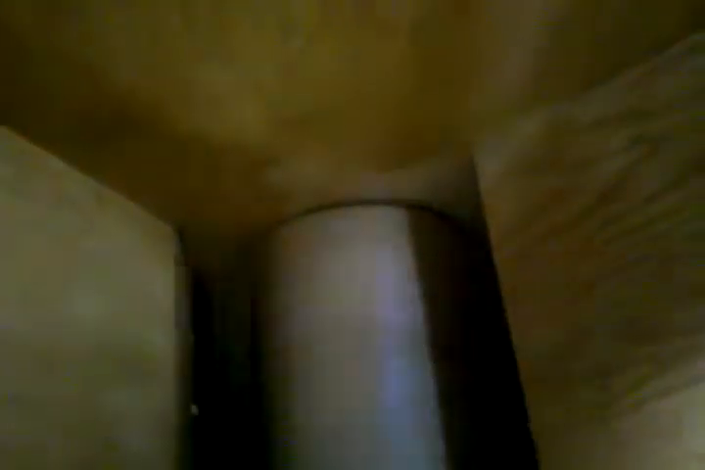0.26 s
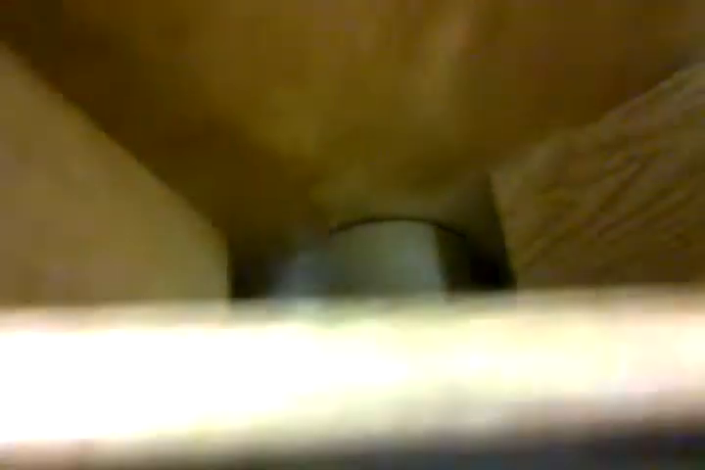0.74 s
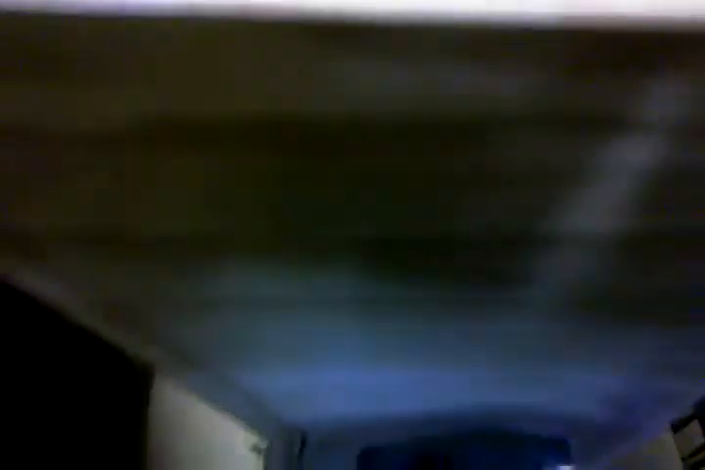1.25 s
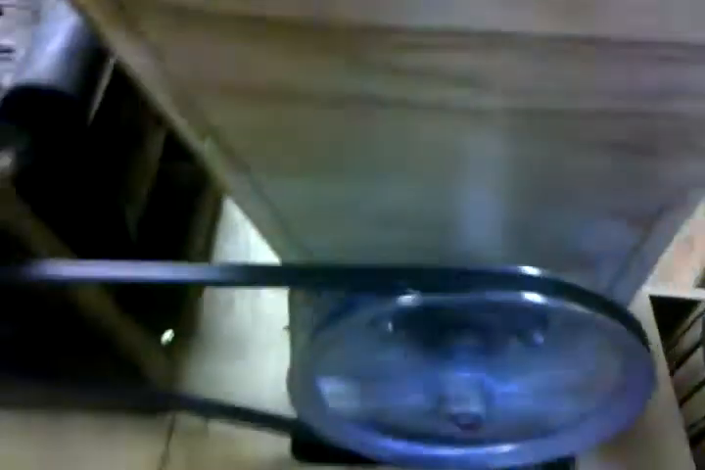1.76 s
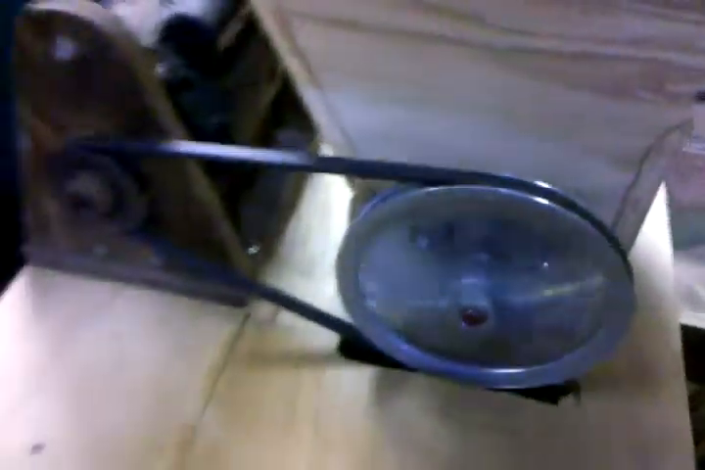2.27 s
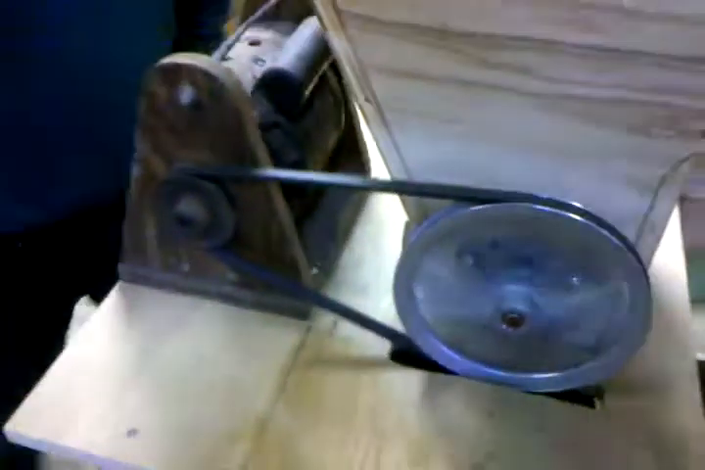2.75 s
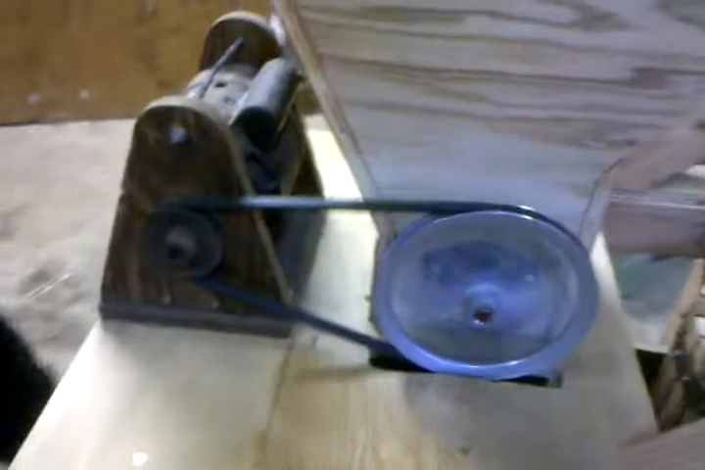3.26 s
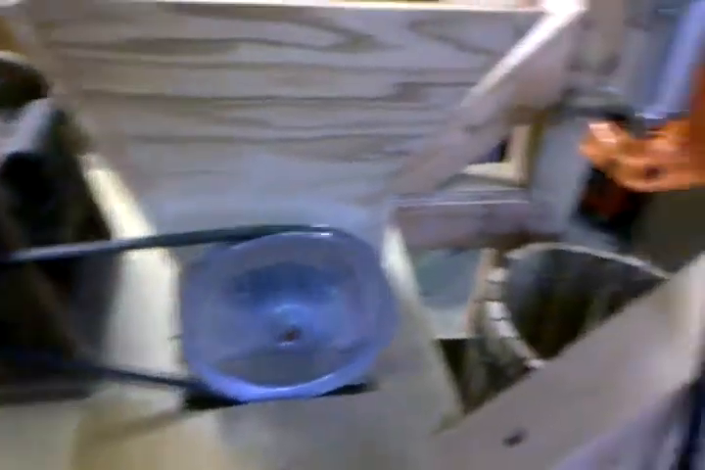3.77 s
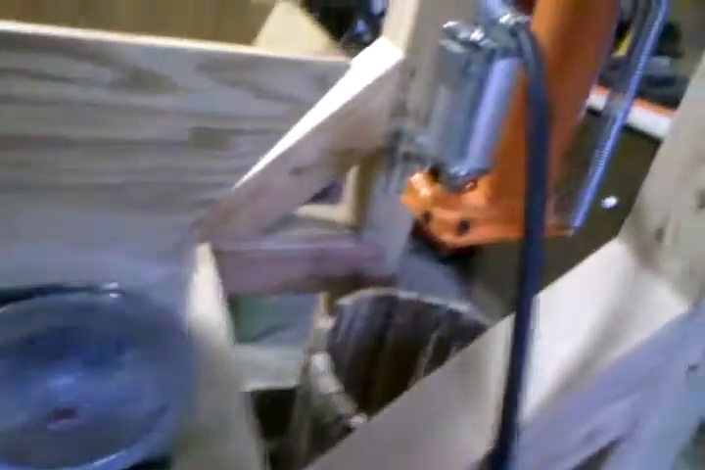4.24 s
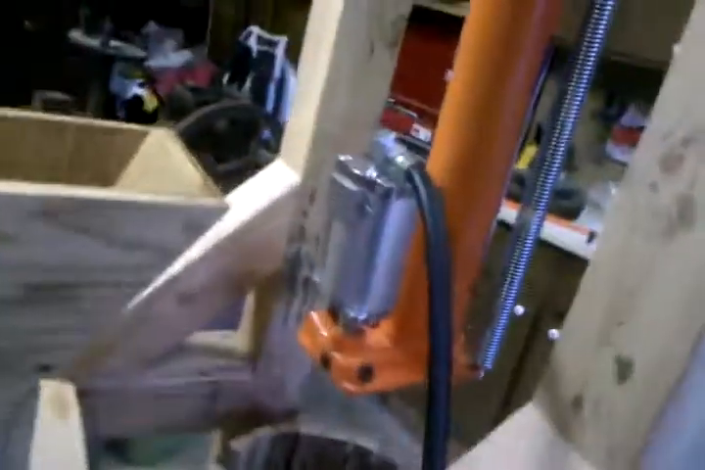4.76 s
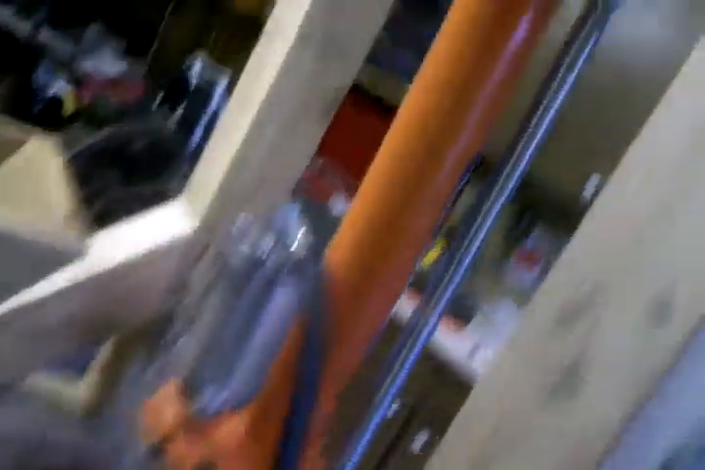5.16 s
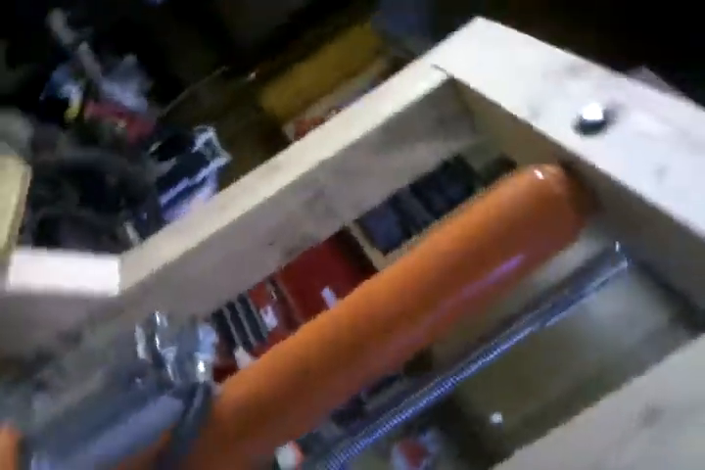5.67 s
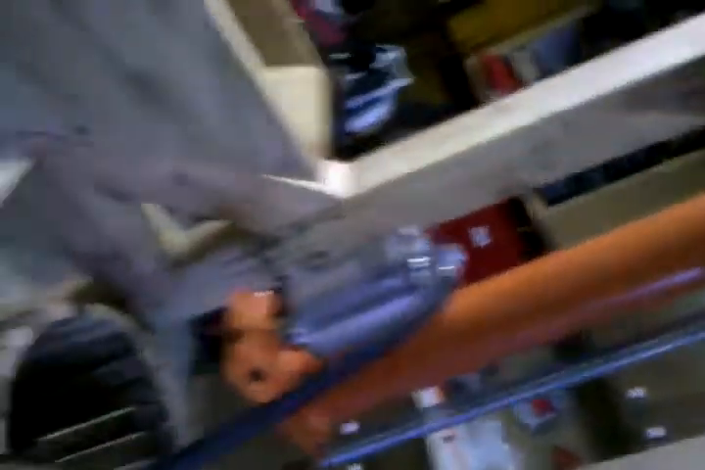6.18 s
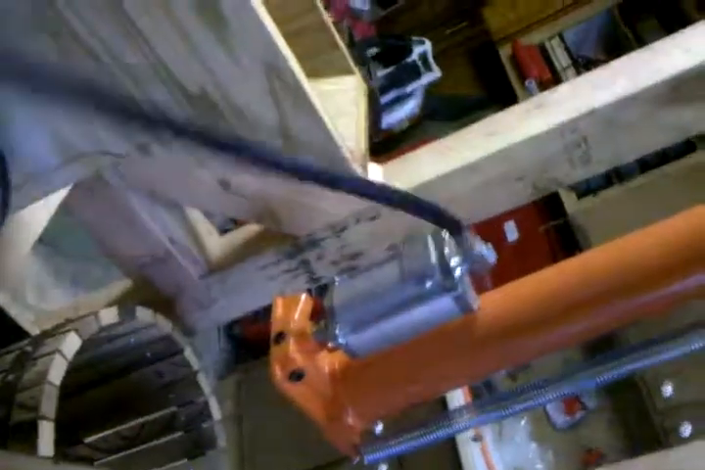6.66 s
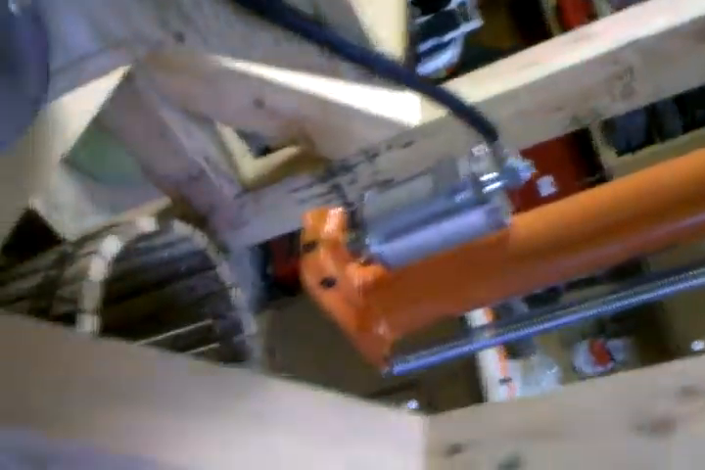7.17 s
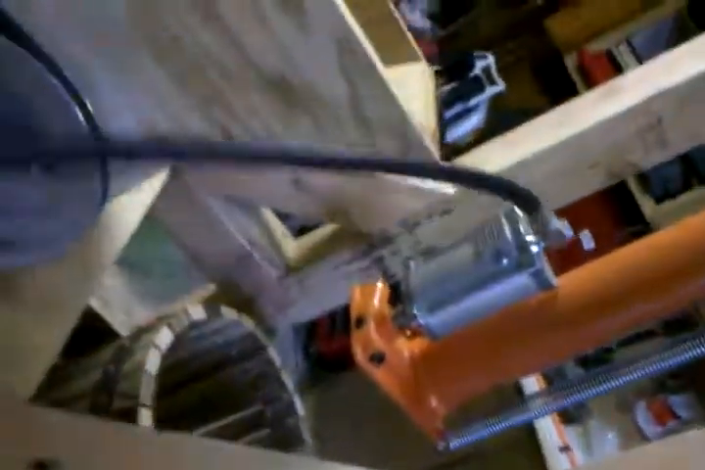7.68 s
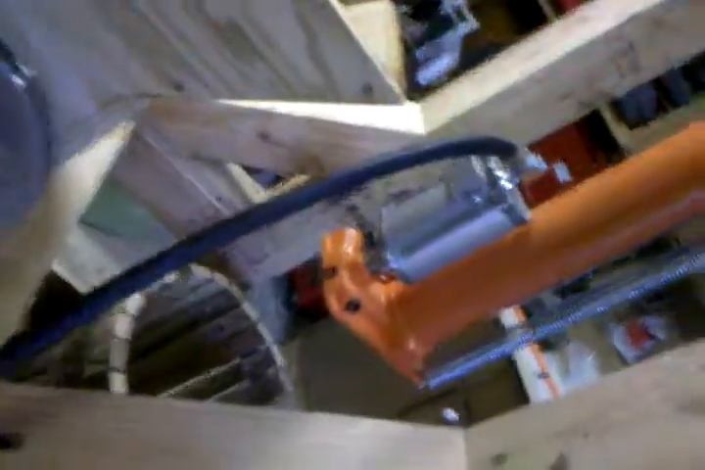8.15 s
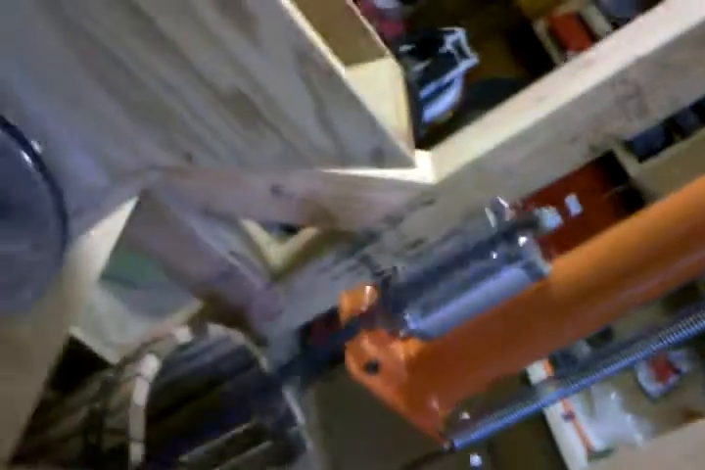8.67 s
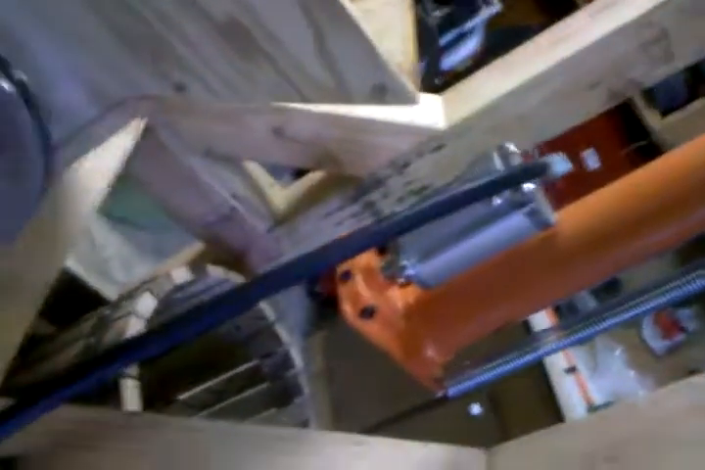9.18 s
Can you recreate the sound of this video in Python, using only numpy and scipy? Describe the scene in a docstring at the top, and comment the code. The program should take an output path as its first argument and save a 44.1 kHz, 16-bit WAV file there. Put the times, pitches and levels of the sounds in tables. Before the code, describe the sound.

A belt-driven grinder hums, knocks and rattles steadily in a workshop; near the end an air jack pumps twice with clacks and hiss.

```python
"""Apple grinder and air jack.

A home-made grinder runs empty in a workshop: a motor belts a toothed drum in a plywood hopper.
Each shaft turn shakes the frame, which hums, knocks and rattles as the microphone is carried round it.
Near the end an air-driven jack pumps twice: clacks, thuds, exhaust hiss. One tick, one dropout."""
import sys
import numpy as np
from scipy import signal
from scipy.fft import rfft, irfft, next_fast_len
from scipy.io import wavfile

SR = 44100
rng = np.random.default_rng(int(sys.argv[2]) if len(sys.argv) > 2 else 0)


def wav_out(sig):
    """Save sig, one row per channel (or a flat mono array), as 16-bit PCM at SR to the path in sys.argv[1]."""
    wavfile.write(sys.argv[1], SR, np.round(np.clip(np.atleast_2d(sig).T, -1, 1) * 32767).astype(np.int16))


N = 415422
TIME_S = np.arange(N) / SR

SHAFT_HZ, FLAP_HZ = 29.195, 19.98
LAP_S, LAP_PEAK_S, LAP_ORDER, LAP_DEPTH_DB = .378, 2.53, 11, 3
TICK_S, LINK_S, LINK_DB = 4.3344, 5.622, -26
DROPOUT_START_S, DROPOUT_END_S = 7.2335, 7.3613

# microphone stops, part: arrive_s, leave_s, fade_s
VISITS = {"hopper": (-1, 1.93, 0.088), "pulley": (1.72, 3.9, 0.22), "jack": (4.06, 5.79, 0.17),
          "press": (5.77, 10, 0.22)}
# frame hum: shaft_order, level_db
FRAME_HUM = [(2, -29), (3, -32.5), (4, -25.5), (5, -22), (6, -21.5), (7, -18.5), (8, -10.5), (9, -19),
             (10, -11.5), (12, -10), (13, -14.5), (15, -17.5), (17, -11.5), (20, -16), (21, -13.5),
             (22, -14), (23, -14.5), (24, -16), (25, -16)]
# harmonics each part radiates best, shaft_order: level_db
HOPPER_HUM = {9: -38, 10: -42.5, 11: -37.5, 13: -42.5, 17: -33, 23: -43.5, 30: -46.5, 33: -44.5, 42: -46,
              44: -47, 70: -47, 93: -49}
PULLEY_HUM = {6: -40, 11: -29.5, 12: -34.5, 13: -34, 23: -44, 29: -48.5, 47: -47.5, 65: -50.5, 93: -51, 94:
              -53.5}
JACK_HUM = {6: -41, 11: -32.5, 12: -37.5, 13: -33.5, 15: -45.5, 21: -38, 24: -39.5, 46: -48, 68: -49.5, 70:
            -44.5, 81: -48.5}
PRESS_HUM = {6: -42.5, 11: -30.5, 12: -36.5, 13: -36, 15: -42, 21: -37.5, 23: -45.5, 24: -40, 25: -39, 33:
             -51, 34: -41, 35: -45.5, 44: -43, 68: -44.5, 70: -45}
# harmonics swelling through the room's standing waves, shaft_order: time_s, level_db
DRONES = { 14: [(0, -47.5), (2.3, -46.5), (3.1, -39), (4.3, -41), (4.7, -33), (5.3, -32.5), (5.9, -32),
          (6.4, -43), (7, -45)], 16: [(0.1, -44), (0.8, -35.5), (1.7, -29), (2.2, -30), (3.1, -24.5),
          (3.8, -25), (4.7, -35), (5.5, -33.5), (6.0, -29), (7.0, -26), (7.7, -25), (9.2, -29)],
          18: [(0, -34.5), (1.5, -37), (1.85, -35), (2.35, -34), (2.7, -55), (3.4, -49), (4.4, -34.5),
          (6, -46.5)], 19: [(0, -36.5), (1.2, -29.5), (1.6, -32), (2.1, -48), (2.6, -40), (3.3, -36),
          (5.15, -32.5), (5.8, -38), (6.3, -35)], 31: [(0, -37.5), (1.6, -46), (1.85, -47), (2.1, -39.5),
          (3.4, -45.5), (5.2, -39), (6.1, -50.5), (7.6, -39.5)], 32: [(0, -38.5), (1.7, -39.5), (1.98, -51),
          (2.3, -42), (3.2, -40), (5.2, -44), (6.0, -54), (7.6, -47.5)], 45: [(0.9, -49), (1.2, -42),
          (1.42, -35), (1.7, -46.5), (3.5, -45), (4.5, -54)], 69: [(1.8, -48), (2.0, -50), (3.9, -49),
          (4.9, -50.5), (5.8, -47), (7.5, -47)]}
# motor and belt tones: pitch_hz, level_db
MAINS_TONES = [(120, -57.5), (360, -40)]
BELT_TONES = [(131.5, -51.5), (146, -52.5), (161, -57.5), (248, -55.5), (277.3, -50.5), (306.5, -44.5),
              (389, -43.5), (423.3, -47.5), (452.5, -51.5)]
# slack side of the belt: flap_order, level_db
FLAP_HARMONICS = [(15, -48.5), (17, -46.5), (20, -38.5), (21, -49), (22, -50), (23, -50), (24, -42),
                  (25, -38.5), (27, -53.5), (31, -52.5), (33, -51.5)]
# hopper air resonance: time_s, pitch_hz, level_db
CAVITY_PATH = [(0, 520, -40), (1.2, 522.4, -36.5), (2.0, 499.5, -36.5), (2.701, 489, -49), (4, 477, -48)]
# three knocks a turn: phase_turns, level_db
BEATS = [(.875, 0), (.485, -3), (.28, -6)]
# levels along the walk: time_s, level_db
KNOCK_LEVELS = [(0, -37), (1.3, -32), (2.0, -39), (2.9, -37.5), (4.2, -48.5), (6.4, -42.5), (7.6, -33.5),
                (9.4, -31)]
RUMBLE_LEVELS = [(0, -40.5), (1.4, -41), (2.7, -42), (4.3, -43), (6.3, -40), (7.1, -46), (7.6, -49.5),
                 (9.4, -48.5)]
RIM_LEVELS = [(1.9, -45), (2.17, -25), (2.28, -37), (2.38, -27.5), (2.55, -29), (2.65, -32), (2.9, -33),
              (3.1, -41)]
# shaft slams, pings of the jack's fittings: start_s, level_db
SLAMS = [(0.033, -32), (1.344, -27), (2.116, -28), (2.527, -30), (2.938, -25), (3.041, -26), (3.075, -23),
         (3.228, -28), (3.998, -30), (5.302, -24), (5.949, -29), (6.159, -30), (7.557, -30), (7.662, -28)]
FITTING_PINGS = [(6.116, -33), (6.215, -35), (6.795, -34), (6.842, -37), (7.173, -31)]
# metal rattle swells: centre_s, width_s, gain_db
RATTLE_SWELLS = [(1.42, 0.26, 1.5), (2.3, .2, 0.8), (2.94, .08, 1.5)]
# metal rubs: start_s, length_s, from_hz, to_hz, level_db
SQUEAKS = [(2.960, 0.035, 1937, 2060, -28), (4.842, 0.011, 1130, 1620, -23)]
# timber frame booms: start_s, level_db, pitch_hz, hold_s, t60_s
THUDS = [(8.943, -22, 198, .01, 0.21), (9.008, -15, 198, .022, .05), (9.268, -27, 180, 0.045, .3)]
# jack strokes: open_s, open_db, strike_s, strike_db, shut_s, shut_db
STROKES = [(9.0058, -17, 9.0250, -13.5, 9.212, -27), (9.264, -26, 9.278, -15, 9.4015, -25.5)]
# body responses: freq_hz, gain_db
MOTOR_SPECTRUM = [(45, -34.5), (88, -19), (120, 3.5), (155, 1.5), (200, -7), (260, -13.5)]
PLYWOOD_SPECTRUM = [(90, -44.5), (150, -21.5), (195, -16), (270, -8), (298, -4), (320, 1.5), (342, -3.5),
                    (380, -6), (440, -10.5), (510, -10), (590, -15), (700, -9), (820, -17), (1100, -27)]
METAL_SPECTRUM = [(600, -22.5), (800, -0.5), (920, -4.5), (1100, -1.5), (1230, 2), (1480, -3.5), (1700, -6),
                  (1880, 0.5), (2030, -1), (2230, -9), (2400, -5.5), (2800, -7.5), (3400, -15.5),
                  (5000, -21.5)]
DRUM_SPECTRUM = [(2000, -6), (2900, -1.5), (3500, -3.5), (4100, -1), (4700, -8.5), (5500, -13),
                 (7500, -33.5)]
BEARING_SPECTRUM = [(3500, -18), (4800, -6.5), (5500, -1), (6100, 2.5), (6450, -1.5), (6850, 0),
                    (7300, -17.5), (7900, -24.5)]
CLACK_SPECTRUM = [(100, -13), (200, 0), (400, 11), (800, 0), (1300, -1), (2000, 5), (3000, -1.5),
                  (3800, 1.5), (5000, -3.5), (6200, 1.5), (6900, -0.5), (7500, -23)]
EXHAUST_SPECTRUM = [(400, -5), (1200, -7), (1900, 2.5), (3200, -15), (3850, -4), (4250, -15), (5200, -14),
                    (5620, 2), (5950, 2.5), (6200, 1), (6450, 1), (6650, -7), (6850, -10), (7300, -25)]
# ringing modes: pitch_hz, gain_db, t60_s
HOPPER_MODES = [(318, 10.5, 0.025), (370, 0.5, 0.031), (490, 5, 0.024), (690, -2, 0.024)]
RIM_MODES = [(1900, -9.5, .04), (2016, 0, .055)]
TICK_MODES = [(1150, -2, 0.002), (2170, -5, 0.0018), (5500, -6, 0.0028), (14000, -13, .002)]
LINK_MODES = [(1010, 5, .022), (1244, 8, 0.025), (4930, -5, .014), (5450, 0, 0.015), (5990, -9, .014)]
FITTING_MODES = [(5370, -1.5, .075)]
VALVE_MODES = [(1480, -1, 0.047), (2300, 4, 0.026), (3210, 2, 0.026)]
PISTON_MODES = [(115, -6, 0.045), (1290, -4, 0.019), (3780, 0, .03)]
SEAT_MODES = [(130, -3, .03), (580, 13.5, 0.053)]


def from_db(db):
    """Decibels to gain."""
    return np.exp(np.asarray(db, np.float32) * np.float32(np.log(10) / 20))


def unit_rms(x):
    """Scale to rms 1."""
    return x / np.sqrt(np.mean(x ** 2) + 1e-20)


def sine(cycles):
    """Sine of a phase in cycles."""
    return np.sin((2 * np.pi * (cycles - np.floor(cycles))).astype(np.float32))


def gain_curve(levels):
    """Gain through time_s, level_db points."""
    return from_db(np.interp(TIME_S, *np.transpose(levels)))


def drift(rate_hz):
    """Low-passed random curve, spread 1."""
    hop, settle = 100, 2000
    pole = np.exp(-2 * np.pi * rate_hz * hop / SR)
    noise = rng.standard_normal(N // hop + settle + 2)
    slow = signal.lfilter([1], [1, -2 * pole, pole * pole], noise)[settle:]
    slow = unit_rms(slow - slow.mean())
    return np.interp(np.arange(N) / hop, np.arange(len(slow)), slow)


def colour(drive, spectrum):
    """Drive through a body's response, rms 1."""
    hz, db = np.transpose(spectrum)
    size = next_fast_len(N)
    log_hz = np.log(np.arange(size // 2 + 1) * SR / size + 1)
    outside = np.abs(log_hz - np.clip(log_hz, np.log(hz[0]), np.log(hz[-1])))
    response = from_db(np.interp(log_hz, np.log(hz), db) - 60 * outside)
    return unit_rms(irfft(rfft(drive, size) * response, size)[:N])


def click(start_s):
    """Unit impulse."""
    return signal.unit_impulse(N, round(start_s * SR))


def ring(clicks, hz, t60_s):
    """One mode: a unit click starts a decaying unit sine."""
    pole, step_rad = np.exp(-np.log(1000) / (t60_s * SR)), 2 * np.pi * hz / SR
    feedback = [1, -2 * pole * np.cos(step_rad), pole * pole]
    return signal.lfilter([0, np.sin(step_rad)], feedback, clicks + 1e-18)


def strike(start_s, level_db, modes):
    """One blow rings a body's modes."""
    out, start = np.zeros(N), round(start_s * SR)
    age_s = TIME_S[:min(SR // 2, N - start)]
    for hz, db, t60_s in modes:
        out[start:start + len(age_s)] += from_db(level_db + db - 60 * age_s / t60_s) * sine(hz * age_s)
    return out


def burst(start_s, level_db, hold_s=.0016, t60_s=.025, rise_s=0):
    """Envelope: onset, hold, decay."""
    age_s = TIME_S - start_s
    onset = np.clip(age_s / rise_s, 0, 1) if rise_s else age_s >= 0
    return onset * from_db(level_db - 60 * np.clip((age_s - hold_s) / t60_s, 0, 2))


def near(part):
    """Microphone nearness to a part, 0 to 1."""
    arrive_s, leave_s, fade_s = VISITS[part]
    return (np.tanh((TIME_S - arrive_s) / (2 * fade_s)) - np.tanh((TIME_S - leave_s) / (2 * fade_s))) / 2


def shaft_turns(wander=.0002, flutter=.0005, skip_turns=.12):
    """Running turn count; the belt tugs at the speed. The beat skips ahead at the dropout."""
    speed_hz = SHAFT_HZ * (1 + wander * drift(.8) + flutter * drift(12))
    return np.cumsum(speed_hz) / SR + skip_turns * (TIME_S > DROPOUT_START_S)


def belt_lap_db():
    """Belt tension lifts the level once a lap."""
    return LAP_DEPTH_DB * np.cos(2 * np.pi * (TIME_S - LAP_PEAK_S) / LAP_S)


def frame_hum(turns, frame_db=-30.5, wander_db=1.95, parts_db=-.44, smear_rad=.051):
    """Shaft harmonics: the frame's everywhere, each part's when near. The knocks set their phases."""
    power = {round(order): gain_curve(levels) ** 2 for order, levels in DRONES.items()}
    for order, db in FRAME_HUM:
        power[round(order)] = from_db(frame_db + db + wander_db * drift(.72)) ** 2
    for part, harmonics in zip(VISITS, (HOPPER_HUM, PULLEY_HUM, JACK_HUM, PRESS_HUM)):
        nearness = near(part)
        for order, db in harmonics.items():
            power[round(order)] = power.get(round(order), 0) + nearness * from_db(db + parts_db) ** 2
    power[LAP_ORDER] *= from_db(belt_lap_db()) ** 2
    out = np.zeros(N)
    for order in power:
        push = sum(from_db(db) * np.exp(-2j * np.pi * order * phase) for phase, db in BEATS)
        phase_rad = np.angle(push) + smear_rad * order * drift(.2)
        out += np.sqrt(2 * power[order]) * sine(order * turns + phase_rad / (2 * np.pi))
    return out


def tones(rows, wander_db, waver_cycles):
    """Sines drifting in level and phase."""
    out = np.zeros(N)
    for hz, db in rows:
        out += from_db(db + wander_db * drift(1)) * sine(hz * TIME_S + waver_cycles * drift(2.2))
    return np.sqrt(2) * out


def mains_hum():
    """The motor's mains hum, loudest by the pulley."""
    return from_db(7.5 * near("pulley")) * tones(MAINS_TONES, wander_db=1, waver_cycles=.055)


def belt():
    """The belt drones; its slack side flaps at its own rate."""
    drone = from_db(1.3 * near("press")) * tones(BELT_TONES, wander_db=3, waver_cycles=.12)
    flap_tones = [(round(order) * FLAP_HZ, db) for order, db in FLAP_HARMONICS]
    return drone + tones(flap_tones, wander_db=2.5, waver_cycles=.074)


def hopper_air(width_hz=21):
    """The drum stirs the hopper's air, which rings in a narrow band."""
    time_s, hz, db = np.transpose(CAVITY_PATH)
    phase_rad = 2 * np.pi * np.cumsum(np.interp(TIME_S, time_s, hz)) / SR
    band = drift(width_hz) * np.cos(phase_rad) + drift(width_hz) * np.sin(phase_rad)
    return from_db(np.interp(TIME_S, time_s, db)) * band


def knocks(turns, uneven_db=4.5, slack_s=.0004):
    """Play lets the shaft knock the hopper three times a turn, unevenly, and sometimes slam."""
    beats = [(i, db) for phase, db in BEATS for i in np.flatnonzero(np.diff(np.floor(turns - phase)))]
    at, beat_db = np.transpose(beats)
    timing, force, *mode_scatter = rng.standard_normal((N // 100, len(HOPPER_MODES) + 2))[:len(at)].T
    at = np.clip(at + slack_s * SR * timing, 0, N - 1).astype(int)
    force_db = beat_db + uneven_db * np.tanh(force) + belt_lap_db()[at]
    slams = sum(from_db(db) * click(start_s) for start_s, db in SLAMS)
    knocking, slamming = np.zeros(N), np.zeros(N)
    for (hz, db, t60_s), scatter in zip(HOPPER_MODES, mode_scatter):
        clicks = np.zeros(N)
        clicks[at] = from_db(db + force_db + .5 * uneven_db * np.tanh(scatter))
        knocking += ring(clicks, hz, t60_s)
        slamming += from_db(db) * ring(slams, hz, t60_s)
    panels = signal.butter(2, [270, 800], "band", fs=SR, output="sos")  # thin panels, soft blow
    return signal.sosfilt(panels, gain_curve(KNOCK_LEVELS) * unit_rms(knocking) + slamming)


def contacts(turns, spectrum, repeat_db, grain_db, throb_db, patterns=6):
    """Rough surfaces meet alike each turn, shifting along the walk; loose parts chatter. Rms 1."""
    size = round(SR / SHAFT_HZ)
    angle = (turns % 1 * size).astype(int)
    bumps = rng.standard_normal((patterns, size))
    place = TIME_S / TIME_S[-1] * (patterns - 1)
    row = np.minimum(place.astype(int), patterns - 2)
    blend_rad = (place - row) * np.pi / 2
    repeating = bumps[row, angle] * np.cos(blend_rad) + bumps[row + 1, angle] * np.sin(blend_rad)
    chatter = unit_rms(rng.standard_normal(N) * from_db(grain_db * drift(140)))
    orders = np.arange(1, 12)[:, None]
    cycles = orders * np.arange(size) / size + rng.random(orders.shape)
    pressure = unit_rms(np.sum(sine(cycles) / orders ** .21, axis=0))
    drive = (from_db(repeat_db) * repeating + chatter) * from_db(throb_db * pressure[angle])
    return colour(drive, spectrum)


def motor_rumble(turns):
    """The motor shakes on its mount."""
    rumble = contacts(turns, MOTOR_SPECTRUM, repeat_db=-8, grain_db=1, throb_db=-.1)
    return gain_curve(RUMBLE_LEVELS) * rumble


def plywood_rattle(turns, dip_db=-.6, dip_turns=.073, flap_db=3.5):
    """Panels rattle, dipping slightly at each knock; belt flap makes them throb, except by the press."""
    level_db = -31.8 + 3.2 * near("hopper") + 1.2 * near("jack")
    level_db += flap_db * (1 - near("press")) * np.cos(2 * np.pi * FLAP_HZ * TIME_S)
    pulses = sum(from_db(db) * np.exp(-(((turns - phase + .5) % 1 - .5) / dip_turns) ** 2)
                 for phase, db in BEATS)
    rattle = contacts(turns, PLYWOOD_SPECTRUM, repeat_db=-17, grain_db=1.5, throb_db=1)
    return from_db(level_db) * unit_rms(from_db(dip_db * pulses)) * rattle


def metal_rattle(turns):
    """The shaft rattles metal parts, drum and bearing; the balance follows the microphone."""
    by_pulley, by_jack, by_press = near("pulley"), near("jack"), near("press")
    swell_db = sum(db * np.exp(-((TIME_S - s) / width_s) ** 2) for s, width_s, db in RATTLE_SWELLS)
    metal = contacts(turns, METAL_SPECTRUM, repeat_db=-.3, grain_db=1.9, throb_db=.5)
    metal *= from_db(-32 + swell_db - .44 * by_pulley + 1.8 * by_jack + .98 * by_press)
    drum = contacts(turns, DRUM_SPECTRUM, repeat_db=-1.5, grain_db=3, throb_db=1.5)
    drum *= from_db(-44.5 + swell_db + 4.7 * by_jack + 8.66 * by_press)
    bearing = contacts(turns, BEARING_SPECTRUM, repeat_db=-3.5, grain_db=2, throb_db=.5)
    bearing *= from_db(-42.5 - 1.6 * by_jack - 1.9 * by_press)
    return metal + drum + bearing


def pulley_pings(turns, touch_turns=.03, uneven_db=1):
    """The pulley's rim is touched once a turn and rings."""
    touches = np.diff(np.floor(turns - touch_turns), prepend=0) > 0
    clicks = touches * gain_curve(RIM_LEVELS) * near("pulley") * from_db(uneven_db * drift(10))
    return sum(from_db(db) * ring(clicks, hz, t60_s) for hz, db, t60_s in RIM_MODES)


def squeaks():
    """Metal rubs briefly and chirps upwards."""
    out = np.zeros(N)
    for start_s, length_s, from_hz, to_hz, db in SQUEAKS:
        start, size = round(start_s * SR), round(length_s * SR)
        cycles = np.cumsum(np.linspace(from_hz, to_hz, size)) / SR
        out[start:start + size] += from_db(db) * np.hanning(size) * sine(cycles)
    return out


def tick():
    """One dry, sharp tick."""
    rings = sum(from_db(db) * ring(click(TICK_S), hz, t60_s) for hz, db, t60_s in TICK_MODES)
    return -signal.sosfilt(signal.butter(2, [400, 7600], "band", fs=SR, output="sos"), rings)


def jack_clacks():
    """A loose link clicks, fittings ping; per stroke the valve opens, piston strikes, valve shuts."""
    blows = burst(LINK_S, LINK_DB)
    rings = strike(LINK_S, LINK_DB, LINK_MODES)
    rings += sum(strike(start_s, db, FITTING_MODES) for start_s, db in FITTING_PINGS)
    for open_s, open_db, strike_s, strike_db, shut_s, shut_db in STROKES:
        blows += burst(open_s, open_db) + burst(shut_s, shut_db)
        blows += burst(strike_s, strike_db, hold_s=.0061, t60_s=.093, rise_s=.004)
        rings += strike(open_s, open_db, VALVE_MODES) + strike(shut_s, shut_db, SEAT_MODES)
        rings += strike(strike_s, strike_db, PISTON_MODES)
    return blows * colour(rng.standard_normal(N), CLACK_SPECTRUM) + rings


def frame_thuds():
    """The timber frame takes the jack's load softly and booms low."""
    return sum(burst(start_s, db, hold_s, t60_s, rise_s=.012) * sine(hz * (TIME_S - start_s))
               for start_s, db, hz, hold_s, t60_s in THUDS)


def jack_exhaust(level_db=-28, attack_s=.008, release_s=.012, swell_db=5, swell_s=.014, sputter_db=2):
    """Air vents through a muffler from piston strike to valve shut, swelling late in the stroke."""
    flow = np.zeros(N)
    for _, _, strike_s, _, shut_s, _ in STROKES:
        venting = np.clip(np.minimum((TIME_S - strike_s) / attack_s, 1 + (shut_s - TIME_S) / release_s),
                          0, 1)
        peak_s = strike_s + .71 * (shut_s - strike_s)
        swell = 1 / (1 + ((TIME_S - peak_s) / swell_s) ** 2)
        flow += venting * from_db(level_db + swell_db * swell)
    hiss = rng.standard_normal(N) * from_db(sputter_db * drift(60))
    return flow * colour(hiss, EXHAUST_SPECTRUM)


def scene():
    """Grinder and jack, mono."""
    turns = shaft_turns()
    grinder = frame_hum(turns) + mains_hum() + belt() + hopper_air()
    grinder += pulley_pings(turns) + squeaks() + knocks(turns)
    grinder += motor_rumble(turns) + plywood_rattle(turns) + metal_rattle(turns)
    jack = jack_clacks() + frame_thuds() + jack_exhaust()
    return (grinder + jack)[None]


def record(dry):
    """Small microphone: thin bass, narrow band; a faint hiss lies just above the band. One tick, one dropout."""
    gated = dry * ((TIME_S < DROPOUT_START_S) | (TIME_S > DROPOUT_END_S))
    narrow = signal.sosfilt(signal.ellip(8, .2, 60, 7500, fs=SR, output="sos"), gated)
    narrow = signal.sosfilt(signal.butter(8, 9000, fs=SR, output="sos"), narrow)
    leak = signal.sosfilt(signal.cheby1(5, 1, [7800, 9000], "band", fs=SR, output="sos"), gated)
    mix = narrow + from_db(-10.5) * leak + tick()
    thin = signal.sosfilt(signal.butter(4, 85, "high", fs=SR, output="sos"), mix)
    return signal.sosfilt(signal.ellip(10, .2, 70, 16000, fs=SR, output="sos"), thin)


dry = scene()
out = record(dry)
wav_out(out)
```